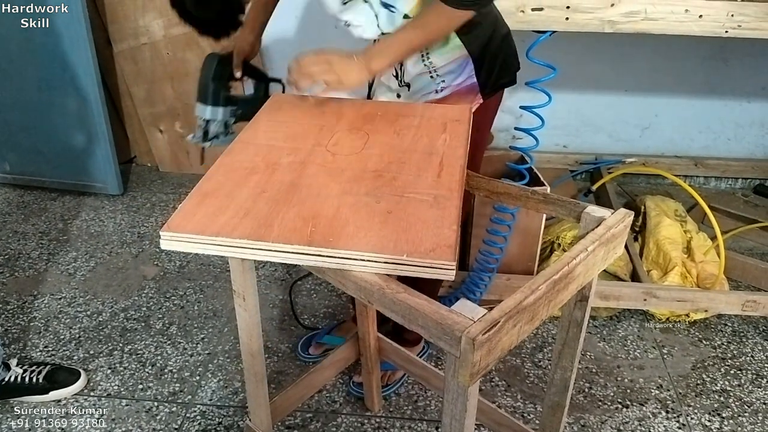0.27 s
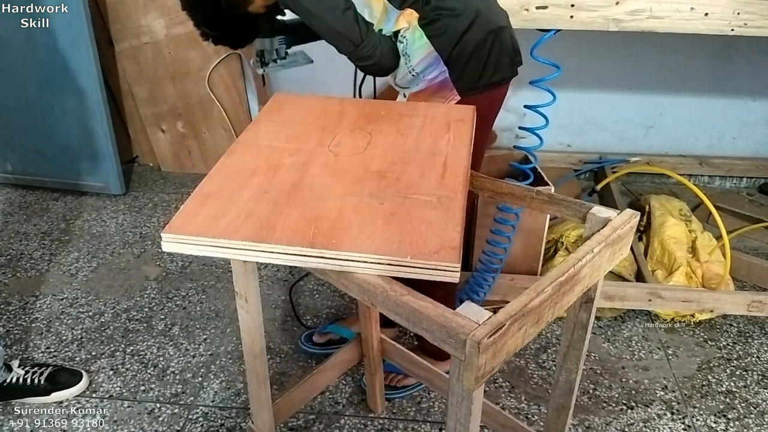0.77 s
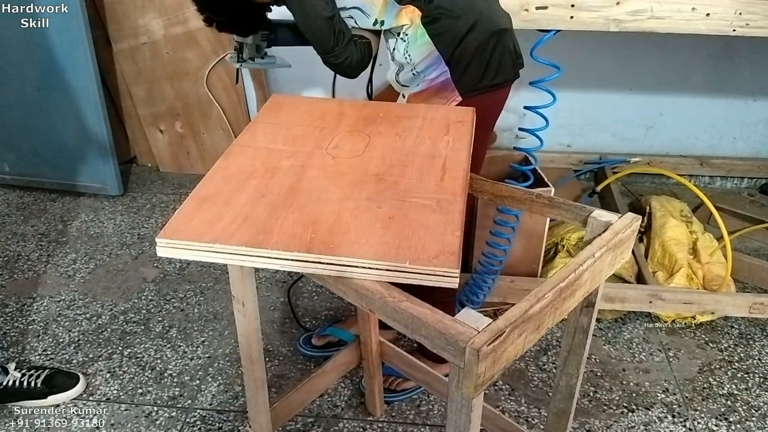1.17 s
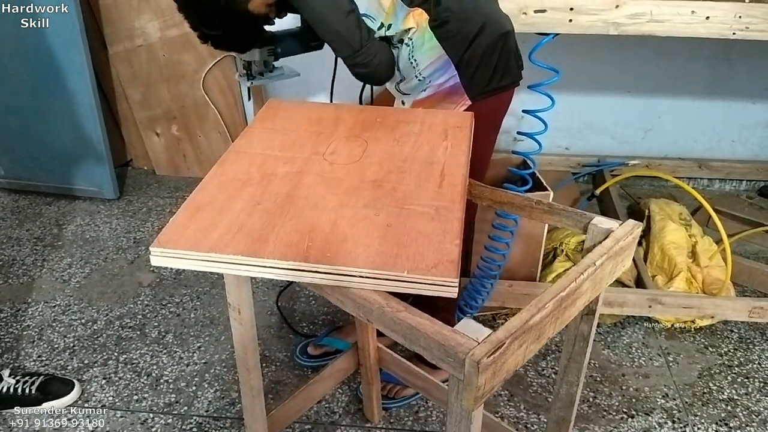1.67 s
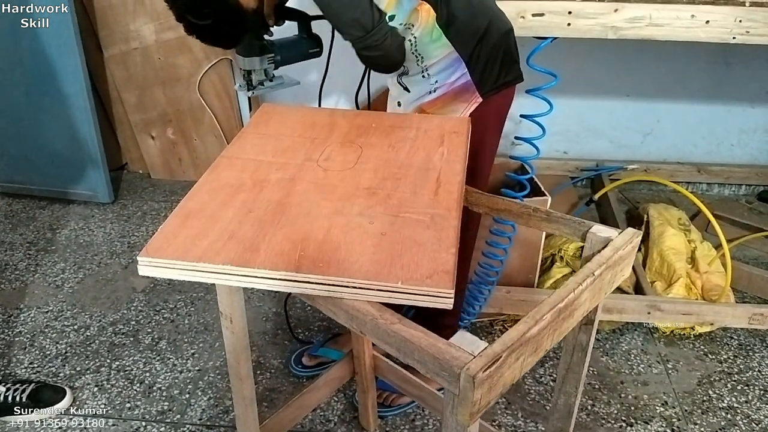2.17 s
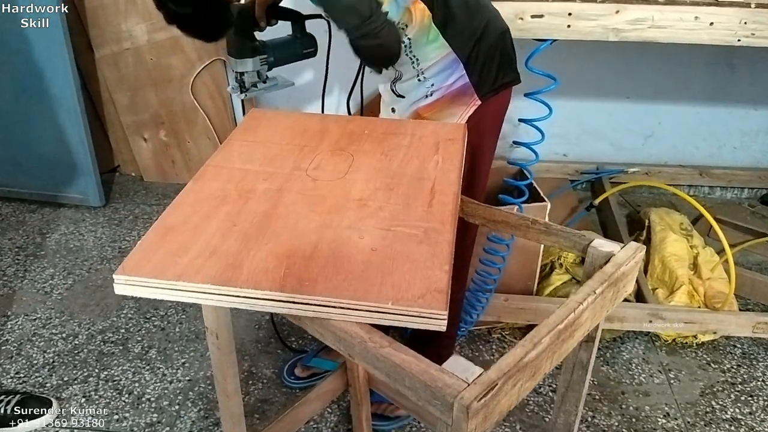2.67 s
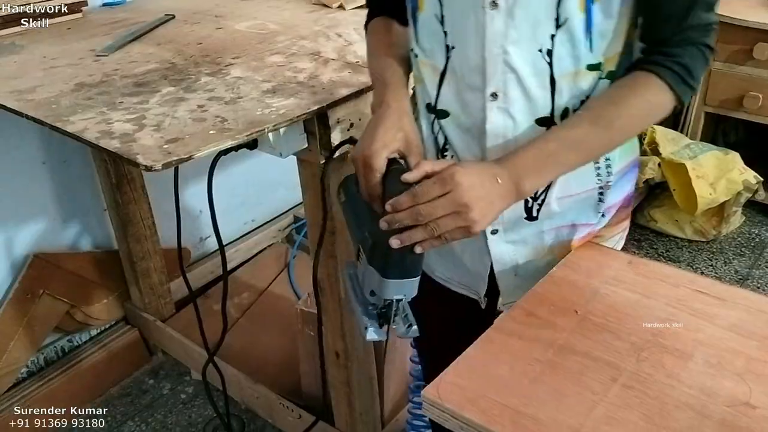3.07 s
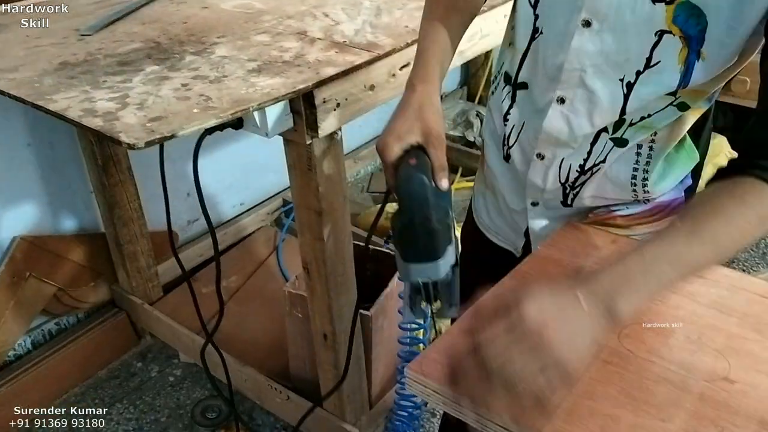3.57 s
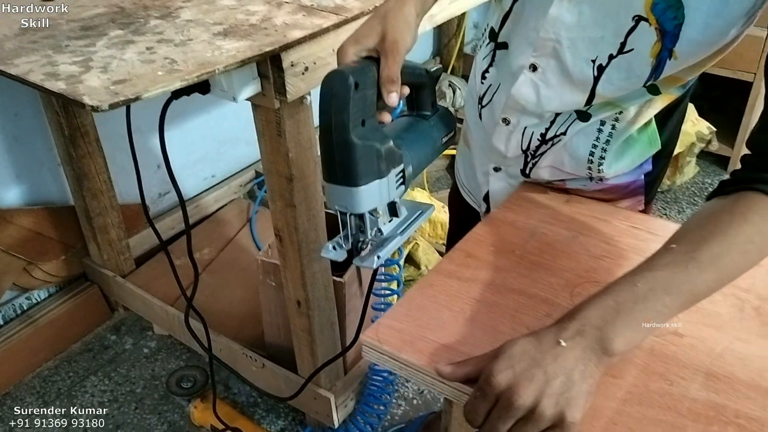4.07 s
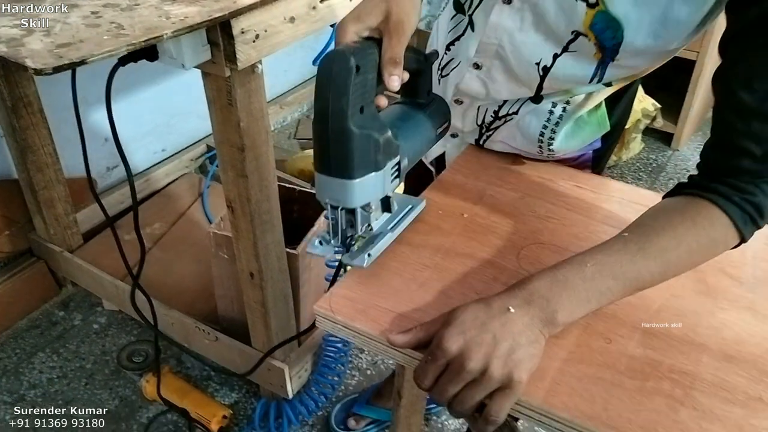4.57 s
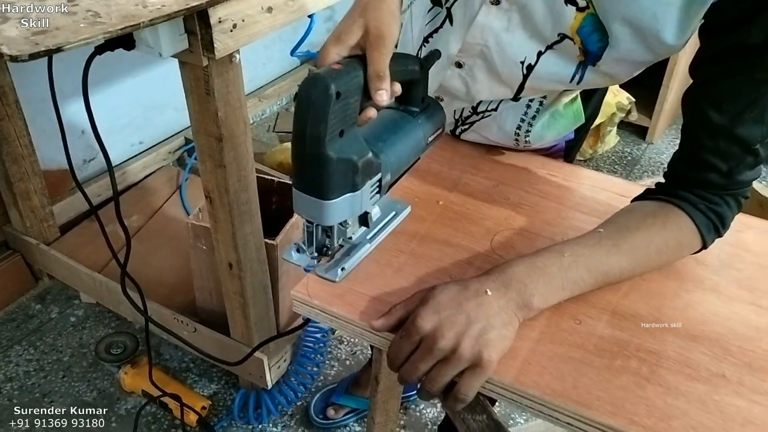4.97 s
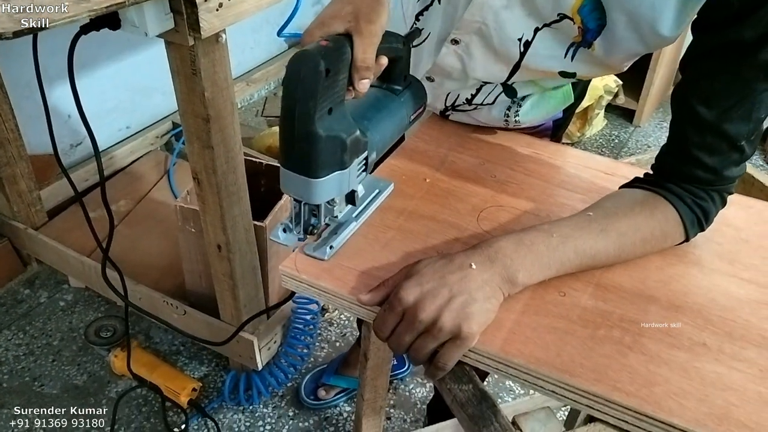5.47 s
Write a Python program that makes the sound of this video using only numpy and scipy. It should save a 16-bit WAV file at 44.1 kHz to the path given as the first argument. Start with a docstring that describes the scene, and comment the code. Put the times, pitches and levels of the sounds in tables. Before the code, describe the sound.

Stereo pickup in a reverberant workshop: constant machine hum, scattered board knocks, some sharp and cracking, others dull and faint. A brief low-powered jigsaw buzz stops with clicks, and a steel tool clinks. One more soft knock, then the saw surges up and is released, its gears rattling as pitch and airflow sink. A second trigger pull brings a fast climb to a full, bright, throbbing motor roar, still running at the close.

```python
"""Jigsaw in a hard-walled workshop

A short trigger blip, a spin-up that coasts down rattling, then a full-speed run: noise bands throb with the stroke,
slot and fan tones follow the shaft. Timber knocks and a steel tool are noise through resonances, decaying as the
hall does, over a steady hum of machines (shaped noise). Air puffs rumble at the two microphone ports as low noise;
a few bright noise clicks sound in a short hiss just as the blip stops."""
import sys
import numpy as np
from scipy import signal
from scipy.fft import rfft, irfft
from scipy.io import wavfile
from scipy.ndimage import uniform_filter1d

SR = 44100
rng = np.random.default_rng(int(sys.argv[2]) if len(sys.argv) > 2 else 0)


def put_to_file(sound):
    """Save the sound as 16-bit audio at rate SR, in the file named by the first command-line argument."""
    columns = np.atleast_2d(sound).T  # one column per channel
    safe = np.clip(columns, -1, 1)
    whole_steps = np.round(safe * 32767)
    wavfile.write(sys.argv[1], SR, whole_steps.astype(np.int16))


N = 253134
T = np.arange(N) / SR
HZ = np.maximum(np.arange(N // 2 + 1) * SR / N, 1)

# likeness of left and right, clipped in use: (f/Hz, likeness/1)
LIKENESS = [(60, 0.96), (130, 1), (290, 0.89), (640, 0.79), (1410, 0.03), (3100, 0.04), (6820, -0.11),
            (15000, 0.27)]
# phase offset between ports, negative where the right port leads: (f/Hz, phase/rad)
PORT_PHASE = [(20, -1), (500, 0.06), (2330, -1.33), (3100, -5), (3880, -8), (8700, -8.5), (15300, -40.5)]
# port colour, left minus right: (f/Hz, level/dB)
PORT_TILT = [(60, -0.5), (110, -0.5), (200, 1), (380, 1.5), (700, 1), (1290, 2.5), (2380, 3.5),
             (4400, -5.5), (8120, -1), (15000, 0)]
# treble lost on the way through the hall: (f/Hz, level/dB)
DISTANCE_LOSS = [(20, 2.5), (6000, -1), (7000, -11.5), (8500, -18.5), (12000, -31), (20000, -39)]
# hall decay by band, before each blow's dry factor: (f/Hz, t60/s)
HALL_DECAY = [(200, 0.49), (530, 1), (1390, 0.68), (3680, 0.56), (7000, 0.3), (13000, .15)]
# hum of machines: (f/Hz, density/dB per Hz)
SHOP_SPECTRUM = [(30, -52), (80, -28.5), (163, -4), (337, -2), (500, -9), (980, -2.5), (1720, -12.5),
                 (2500, -13.5), (3900, -22), (4600, -30.5), (6000, -39), (6500, -54.5), (7500, -62),
                 (8300, -81)]
# air on the ports, before port balance: (t/s, length/s, level/dB)
PUFFS = [(1.99, .02, -46.5), (2.223, .03, -55), (2.44, .12, -63), (2.82, .02, -61), (3.6, .48, -59),
         (4.363, 0.035, -58), (4.746, .02, -62), (4.922, .06, -62), (5.13, .07, -45.5), (5.37, 0.14, -52.5),
         (5.54, 0.091, -48)]
# bright clicks: (t/s, level/dB)
CLICKS = [(1.9943, -36), (2.0108, -37), (2.0164, -56), (2.0358, -61)]
# timber blows, relative: (t/s, level/dB, thud/dB, crack/dB, top/dB)
KNOCKS = [(0.0, -23.5, 3.5, -30, -46), (0.345, -15.5, -20, -9, -30), (0.501, -9.5, -18, -4.5, -19),
          (0.923, -34, -4, -25, -38), (1.185, -38, -5, -19, -46), (1.484, -23.5, -25, -15, -36),
          (1.554, -8, -17, -8.5, -25), (2.459, -32, -7, -21, -27)]
# timber modes, two thud, three body, two crack, two top: (f/Hz, width/Hz, level/dB)
TIMBER_MODES = [(312, 515, 10), (640, 270, 2.5), (1057, 280, 2.5), (1750, 430, -2), (2355, 610, -1),
                (3540, 340, 2), (4150, 360, 0.5), (5330, 1350, 9), (10000, 4400, -4)]
# steel tool blows: (t/s, level/dB, upper modes/dB)
CLINKS = [(1.226, -35, 11), (2.108, -15, -2)]
# steel tool modes, two lower, two upper: (f/Hz, width/Hz, level/dB)
STEEL_MODES = [(3830, 200, -1), (3700, 900, -8), (5750, 700, -13), (7200, 900, -19)]
# gear tones: (f/Hz, level/dB, from/s, to/s)
GEAR_TONES = [(215.5, -38.5, 4.85, 5.4), (307.5, -35.5, 4.85, 5.25), (309, -35, 5.4, 5.8),
              (625, -33, 5.25, 5.55), (926, -29.5, 4.95, 5.65), (845, -31, 4.6, 4.95),
              (3881, -35, 4.7, 5.8), (3278, -39, 4.7, 5.8)]
# saw boom: (f/Hz, density/dB per Hz)
BOOM_SPECTRUM = [(90, -49), (150, -27), (250, -16.5), (400, -8.5), (530, -4), (870, -4), (940, -1),
                 (1400, -2.5), (2000, -9.5), (2600, -40.5)]
# gear rattle: (f/Hz, density/dB per Hz)
RATTLE_SPECTRUM = [(1150, -41), (1950, -10.5), (2070, -4), (2350, -3), (2440, -2.5), (2550, -2),
                   (3000, -9.5), (3900, -26.5), (6600, -120)]
# cooling air: (f/Hz, density/dB per Hz)
AIR_SPECTRUM = [(1000, -12), (1700, -9.5), (2070, -14.5), (2170, -6), (2430, -6.5), (2890, -4.5),
                (3870, 1.5), (4480, -4.5), (4980, -3), (5680, -5.5), (6530, -17.5), (7150, -14),
                (8160, -41), (9000, -49), (11700, -101), (19800, -120)]
# saw treble: (f/Hz, density/dB per Hz)
TREBLE_SPECTRUM = [(4410, -33.5), (7500, -5.5), (8170, -13), (9320, -21), (9580, -26), (11800, -24),
                   (14800, -27), (15200, -32), (15600, -51)]
# housing modes: (f/Hz, width/Hz, level/dB)
HOUSING_MODES = [(697.6, 118, 1), (789, 130, -3.5)]
# gear case mode: (f/Hz, width/Hz, level/dB)
CASE_MODES = [(2364, 55, 0)]
# motor shell modes that the slot whine sweeps through: (f/Hz, width/Hz, level/dB)
SHELL_MODES = [(1450, 250, 3), (2200, 200, 3), (2530, 200, 6), (2730, 200, 5), (3100, 350, 3),
               (3600, 600, 2)]
# loose gears: (t/s, housing ring/dB, gear rattle/dB, gear case ring/dB)
CHATTER = [(2.81, -30, -41, -42), (2.83, -26.5, -26.5, -32), (2.866, -27, -13, -21),
           (2.892, -28.5, -21, -22), (3.0, -25, -17, -28), (3.12, -29.5, -21.5, -21.5),
           (3.25, -25.5, -19.5, -25.5), (3.36, -24, -19, -20.5), (3.5, -26, -17.5, -26),
           (3.7, -26, -17.5, -22), (3.92, -22.5, -18.5, -17.5), (4.0, -28, -21.5, -36.5),
           (4.25, -29, -24, -41), (4.37, -33, -28, -44), (4.442, -33.5, -16.5, -26), (4.5, -23.5, -20, -36),
           (4.7, -25, -22, -37), (5.74, -31, -22.5, -31)]
# slot whine under power, before the shell: (shaft f/Hz, level/dB)
SLOT_WHINE = [(60, -60), (120, -21), (170, -24), (213, -15), (243, -18), (300, -23), (350, -39), (480, -45)]
# fan whine under power, by its pitch: (f/Hz, level/dB)
FAN_WHINE = [(2000, -63), (3600, -49), (5800, -50), (7600, -57), (8600, -57), (10000, -71), (11000, -66),
             (12200, -47), (13000, -62), (14200, -66), (14700, -63)]
# slot whine overtones, relative to the cooling air, before the vents: (shaft multiple/1, level/dB)
OVERTONES = [(24, -19), (36, -15), (48, -24), (60, -26)]
# vents by which the overtones leave: (f/Hz, level/dB)
VENTS = [(1000, -30), (3500, -12), (5000, -5), (6000, -3), (7000, -5), (7600, -19), (8300, -36),
         (9500, -55), (15000, -80)]
# level each part reaches in the blip: part name -> level/dB
BLIP_DB = dict(boom=-31.5, housing=-28, rattle=-25, case=-27, air=-36, treble=-100)

TOP_HZ, MIN_LIKENESS = 15730, 0.24
SHOP_DB, BREEZE_DB = -31, -72
PUFF_RISE_DB_PER_S, PUFF_FALL_DB_PER_S = 247, 201
# hiss around the clicks
HISS_S, HISS_DB, HISS_RISE_DB_PER_S, HISS_FALL_DB_PER_S = 1.994, -56, 1100, 450

SLOTS, FAN_BLADES, STROKES_PER_TURN = 12, 31, 0.13
# slow blip before the first pull
BLIP_S, BLIP_SWELL_S, BLIP_STOP_S = 1.853, 0.063, 2.013
# two trigger pulls, one release between
PULLS_S, RELEASE_S, HEARD_FROM_S = (2.793, 4.382), 3.02, 2.808
# spin-up: a quick and a slow approach
TOP_TURNS_HZ, QUICK_S, SLOW_S, SLOW_SHARE = 477.3, .0658, .2177, .535
# run-down: drag time; offset by which friction stops the shaft
COAST_S, FRICTION_HZ = 1.495, 130.5
# (level/dB at and above the knee, loss/dB per halving of speed, knee/shaft Hz)
BOOM_LAW, AIR_LAW, TREBLE_LAW = (-19, 3.35, 446), (-15.5, 7.12, 404), (-39.5, 11.2, 427)
AIR_SWELL_S = .035  # the air stream needs a moment to build
# one housing jolt as the first run starts
KICK_S, KICK_DB, KICK_WIDTH_S = 2.821, -16.5, .006
# the first pull whines less
SLOT_FIRST_PULL_DB, SLOT_COAST_DB, FAN_COAST_DB = -5, -54, -7


def undb(db):
    """dB to gain."""
    return 10 ** (np.asarray(db) / 20)


def across(table):
    """A (f/Hz, value) table at every frequency bin, interpolated over log frequency."""
    hz, value = np.transpose(table)
    return np.interp(np.log(HZ), np.log(np.maximum(hz, 1)), value)


def spectrum(table):
    """Gain per bin of a (f/Hz, dB) table, silent outside it."""
    return undb(across(table)) * (HZ > table[0][0]) * (HZ < table[-1][0])


def ring(modes):
    """Gain of (f/Hz, width/Hz, dB) resonances, each applied twice."""
    return sum(undb(db) / (1 + 1j * (HZ / hz - hz / HZ) * hz / width) ** 2 for hz, width, db in modes)


def shape(x, gain):
    """Filter by a gain per bin."""
    return irfft(rfft(x) * gain, N)


def unit(x):
    """Scale to rms 1."""
    return x / np.sqrt(np.mean(x ** 2))


def diffuse(gain):
    """Two-port noise of rms 1, alike in the bass, less so in the treble, with a phase offset between ports."""
    likeness = np.clip(across(LIKENESS), MIN_LIKENESS, .98)
    left, other = rfft(rng.standard_normal((2, N))) * gain
    shared = likeness * left * np.exp(-1j * across(PORT_PHASE))
    right = shared + np.sqrt(1 - likeness ** 2) * other
    return unit(irfft(np.array([left, right]), N))


def walk(rate_hz):
    """Random levels held 1 / rate and slewed twice; spread near 1."""
    hold = int(SR / rate_hz)
    steps = np.repeat(rng.standard_normal(N // hold + 1), hold)
    return 1.14 * uniform_filter1d(uniform_filter1d(steps, hold), hold)[:N]


def tone(cycles, rms_db, waver_db, drift_cycles, rate_hz):
    """A sine whose level and phase wander."""
    level = np.sqrt(2) * undb(rms_db + waver_db * walk(rate_hz))
    return level * np.sin(2 * np.pi * (cycles + drift_cycles * walk(rate_hz)))


def peak(start_s, length_s, db, rise_db_per_s, fall_db_per_s):
    """Gain that climbs to db, holds and falls, straight in dB."""
    rise = rise_db_per_s * np.maximum(start_s - T, 0)
    fall = fall_db_per_s * np.maximum(T - start_s - length_s, 0)
    return undb(db - rise - fall)


def echoes(x, t60_s=0.31, wet_db=-2):
    """Direct sound plus a decaying spray of reflections, different at each port."""
    tail = rng.standard_normal((2, N)) * undb(-60 * T / t60_s) * (T > .003)
    tail *= undb(wet_db) / np.sqrt(np.sum(tail ** 2, axis=1, keepdims=True))
    return x + signal.fftconvolve(x[None], tail[:, :SR], axes=1)[:, :N]


def in_hall(start_s, db, gain, build_s=0.0037, dry=0.93, direct=.42):
    """A blow heard mostly as the hall's answer: it builds up fast and dies band by band."""
    age, out = np.maximum(T - start_s, 0), 0
    for hz, t60_s in HALL_DECAY:
        band = np.exp(-(np.log(HZ / hz) / 0.64) ** 2)
        out = out + shape(rng.standard_normal((2, N)), gain * band) * undb(-60 * dry * age / t60_s)
    early = 1 + direct * np.exp(-age / 0.0076)
    both_ports = out + 0.26 * out.mean(0)
    blow = both_ports * undb(db) * (1 - np.exp(-age / build_s)) * early
    return shape(blow, undb(across(DISTANCE_LOSS)))


def shop_hum():
    """Steady machine hum: shaped diffuse noise that wavers slightly."""
    return undb(SHOP_DB + 0.22 * walk(4.0)) * diffuse(spectrum(SHOP_SPECTRUM))


def port_air():
    """Puffs rumble over a wavering breeze, partly alike in both ports."""
    air = undb(BREEZE_DB + 4.5 * walk(11))
    for start_s, length_s, db in PUFFS:
        air = air + peak(start_s, length_s, db, PUFF_RISE_DB_PER_S, PUFF_FALL_DB_PER_S)
    noise = rng.standard_normal((2, N))
    rumble = unit(shape(noise + 0.72 * noise[0], ring([(60.6, 84, 0)])))
    return rumble * air * undb([[-2.0], [2.5]])  # left, right


def bright_clicks():
    """A few bright noise clicks in a short hiss, just as the blip stops."""
    level = peak(HISS_S, 0, HISS_DB, HISS_RISE_DB_PER_S, HISS_FALL_DB_PER_S)
    for click_s, db in CLICKS:
        level = level + undb(db) * np.exp(-((T - click_s) / 0.00051) ** 2)
    return level * unit(shape(rng.standard_normal((2, N)), ring([(10000, 18000, 0)])))


def tool_clinks():
    """Noise through steel modes; sharp onset, more direct sound, quick decay."""
    out = 0
    for start_s, db, upper_db in CLINKS:
        gain = ring(STEEL_MODES[:2]) + undb(upper_db) * ring(STEEL_MODES[2:])
        out += in_hall(start_s, db, gain, build_s=.0005, dry=1.5, direct=2.5)
    return out


def timber_knocks():
    """Noise through timber modes, each blow with its own share of thud, crack and top."""
    out = 0
    for start_s, db, thud, crack, top in KNOCKS:
        shares_db = [thud, thud, 0, 0, 0, crack, crack, top, top]
        modes = [(hz, width, mode_db + share) for (hz, width, mode_db), share in zip(TIMBER_MODES, shares_db)]
        out += in_hall(start_s, db + 6.0, ring(modes))
    return out


def gear_hum():
    """Fixed-pitch gear tones that come and go during the second run."""
    out = np.zeros(N)
    for hz, db, start_s, end_s in GEAR_TONES:
        fade = np.clip(np.minimum(T - start_s, end_s - T) / .1, 0, 1)
        out += fade * tone(hz * T, db, 2.5, .15, 12)
    return out


def spin_up(age_s):
    """Shaft speed in Hz after a pull: two exponential approaches to the top."""
    slow = SLOW_SHARE * np.exp(-age_s / SLOW_S)
    quick = (1 - SLOW_SHARE) * np.exp(-age_s / QUICK_S)
    return TOP_TURNS_HZ * (1 - slow - quick)


def shaft():
    """Speed in Hz and whether the motor pulls (0-1): two spin-ups with a coast between."""
    first, second = (spin_up(np.maximum(T - pull_s, 0)) for pull_s in PULLS_S)
    release_hz = spin_up(RELEASE_S - PULLS_S[0])
    coast = (release_hz + FRICTION_HZ) * np.exp((RELEASE_S - T) / COAST_S) - FRICTION_HZ
    speed = np.where(T < RELEASE_S, first, np.maximum(coast, second))
    pulling = uniform_filter1d(1. * ((T < RELEASE_S) | (second > coast)), size=800)
    return uniform_filter1d(np.maximum(speed, 1), size=600), pulling


def motor_whine(speed, pulling, turns, air):
    """Slot tone through the shell, fan blade tone, and slot overtones riding on the cooling air."""
    slot_db = pulling * np.interp(speed, *np.transpose(SLOT_WHINE)) + (1 - pulling) * SLOT_COAST_DB
    slot_db = slot_db + SLOT_FIRST_PULL_DB * (T < RELEASE_S)
    fan_db = np.interp(FAN_BLADES * speed, *np.transpose(FAN_WHINE)) + (1 - pulling) * FAN_COAST_DB
    slots = shape(tone(SLOTS * turns, slot_db, 2.5, .09, 150), np.abs(ring(SHELL_MODES)))
    fan = tone(FAN_BLADES * turns, fan_db, 3.3, 0.15, 50)
    overtones = sum(tone(multiple * turns, db, 4.5, .12, 30) for multiple, db in OVERTONES)
    return slots + fan + shape(air * overtones, spectrum(VENTS))


def jigsaw():
    """Boom, housing, gears and air throb with the stroke; treble wavers; slots and fan whine with the shaft."""
    speed, pulling = shaft()
    turns = np.cumsum(speed) / SR
    stroke = np.cos(2 * np.pi * STROKES_PER_TURN * turns)
    on = np.clip((T - HEARD_FROM_S) / .004, 0, 1)
    blip = np.clip((T - BLIP_S) / BLIP_SWELL_S, 0, 1) * (T < BLIP_STOP_S)

    def part(name, db):
        """Gain of a part: the two runs plus the blip."""
        return on * undb(db) + blip * undb(BLIP_DB[name])

    def law(full_db, db_per_halving, knee_hz):
        """Level in dB that falls with shaft speed below the knee."""
        return full_db + db_per_halving * np.log2(np.minimum(speed / knee_hz, 1))

    late_db = -12 * np.exp(-np.maximum(T - HEARD_FROM_S, 0) / AIR_SWELL_S)
    boom = part("boom", law(*BOOM_LAW))
    air = part("air", law(*AIR_LAW) + late_db)
    treble = part("treble", law(*TREBLE_LAW) + late_db)
    chatter_s, housing_db, rattle_db, case_db = np.transpose(CHATTER)
    housing = part("housing", np.interp(T, chatter_s, housing_db))
    housing = housing + undb(KICK_DB) * np.exp(-((T - KICK_S) / KICK_WIDTH_S) ** 2)
    rattle = part("rattle", np.interp(T, chatter_s, rattle_db))
    case = part("case", np.interp(T, chatter_s, case_db))

    out = boom * undb(0.56 * stroke + 0.96 * walk(12)) * diffuse(spectrum(BOOM_SPECTRUM))
    out += rattle * undb(1.0 * stroke + 1.26 * walk(25)) * diffuse(spectrum(RATTLE_SPECTRUM))
    out += housing * undb(1.6 * stroke + 1.6 * walk(19)) * diffuse(ring(HOUSING_MODES))
    out += air * undb(0.92 * stroke + 0.53 * walk(24)) * diffuse(spectrum(AIR_SPECTRUM))
    out += treble * undb(1.1 * walk(40)) * diffuse(spectrum(TREBLE_SPECTRUM))
    out += case * diffuse(ring(CASE_MODES)) + gear_hum()
    return out + echoes(on * motor_whine(speed, pulling, turns, air))


def scene():
    """Shop hum, air on the ports, bright clicks, blows in the hall, and the saw."""
    return shop_hum() + port_air() + bright_clicks() + tool_clinks() + timber_knocks() + jigsaw()


def record(dry):
    """The two ports colour the sound differently; the highest peaks are rounded and the top is cut."""
    tilt = undb(np.outer([.5, -.5], across(PORT_TILT)))
    loud = shape(dry, tilt)
    rounded = loud / (1 + loud ** 8) ** (1 / 8)
    return signal.sosfilt(signal.ellip(10, .2, 80, TOP_HZ, fs=SR, output="sos"), rounded)


dry = scene()
out = record(dry)
put_to_file(out)
```